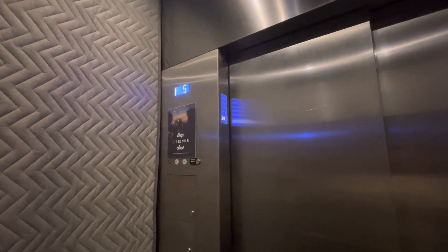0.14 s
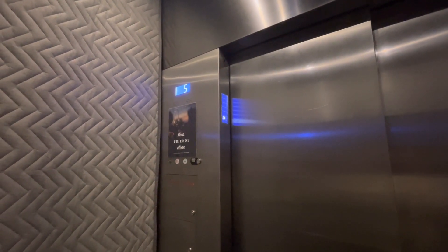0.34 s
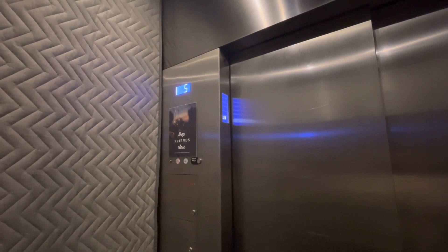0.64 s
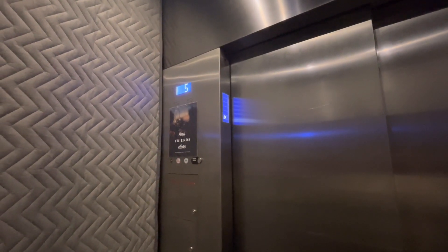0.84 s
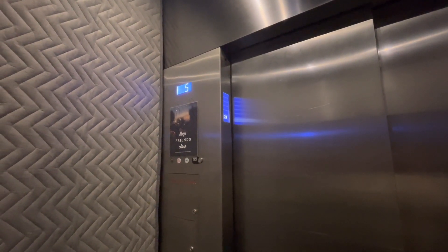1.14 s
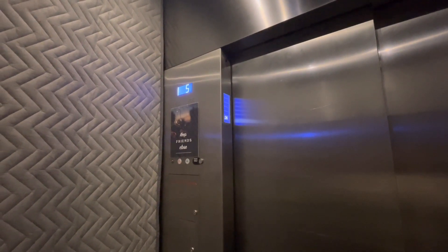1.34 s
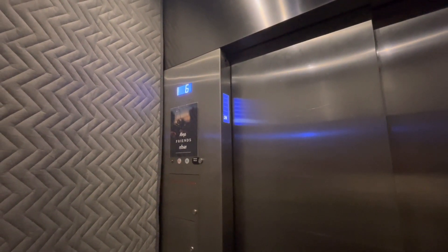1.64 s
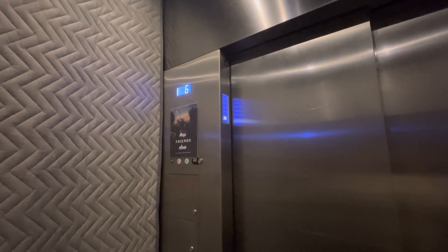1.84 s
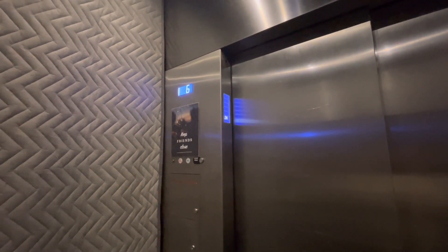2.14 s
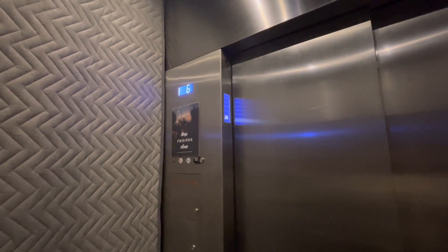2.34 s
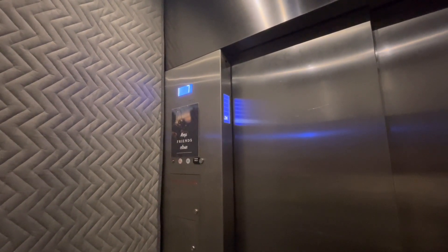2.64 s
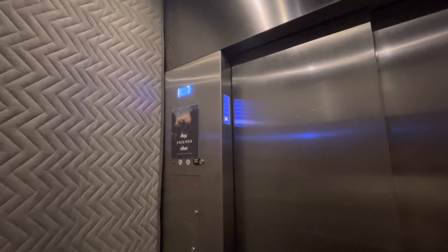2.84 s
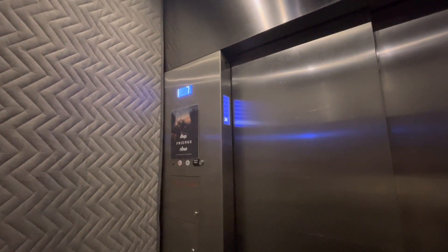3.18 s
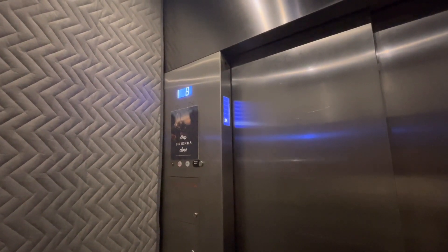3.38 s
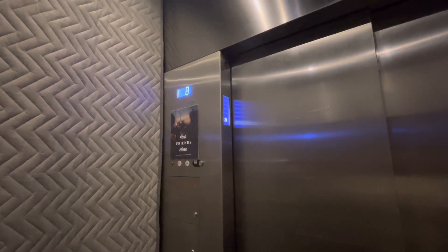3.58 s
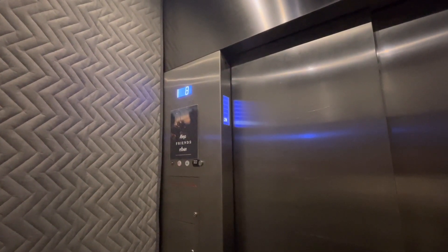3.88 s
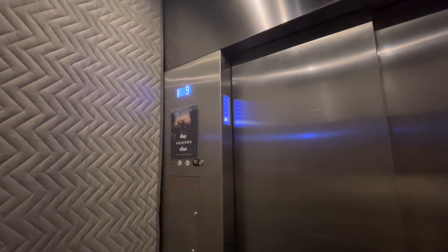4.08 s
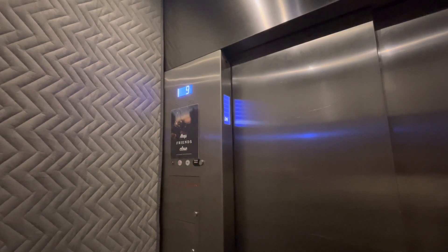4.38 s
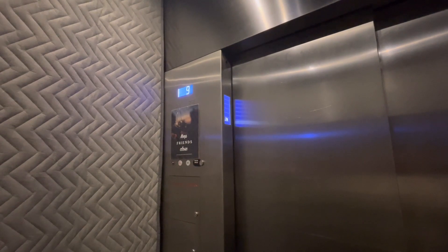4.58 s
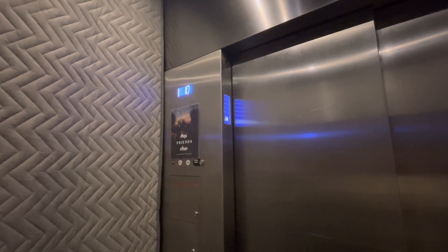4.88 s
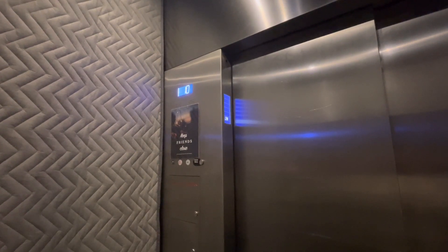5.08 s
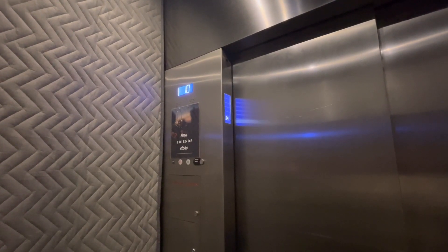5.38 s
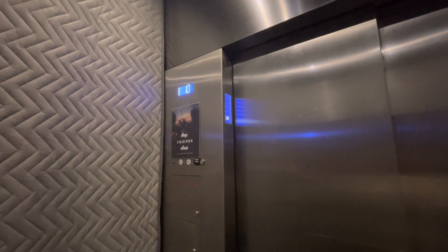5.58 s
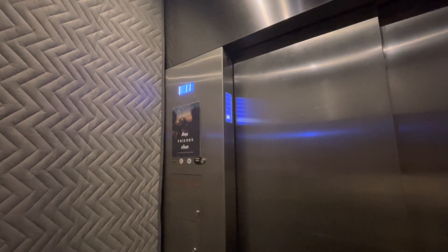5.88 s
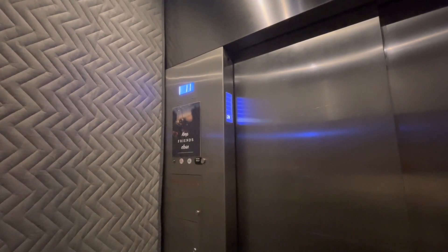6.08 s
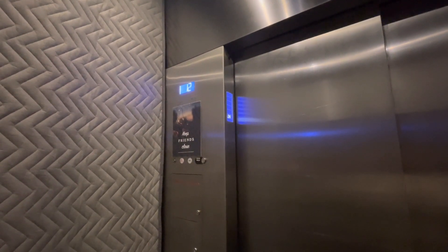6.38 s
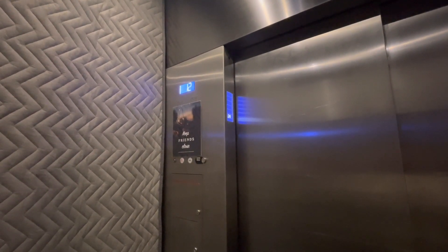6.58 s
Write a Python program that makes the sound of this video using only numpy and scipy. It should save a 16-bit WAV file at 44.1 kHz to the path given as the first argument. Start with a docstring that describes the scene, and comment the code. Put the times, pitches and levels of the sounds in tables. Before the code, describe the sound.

Inside a small steel elevator car, a low rumble and a ventilation fan run throughout. The motor hum rises in pitch as the car gathers speed, then holds, while air rushes along the shaft. A latch gives a dull clack early on. Each passing floor brings a soft, low puff of air, and the door panels tick and rattle faintly, with soft scuffs and one tiny squeak near the end.

```python
"""A low rumble and a rising hum fill a steel elevator car as it gathers speed, then cruises upward.
The rollers shake the cabin's air modes, the drive's hum blooms as it climbs through them, and air
rushes along the shaft. Each landing passes with a soft buffet of squeezed air. Small impacts ring
a latch, the door panels and the trim; soft scuffs and rustles come and go, a guide shoe squeaks
once, and a ventilation fan runs throughout."""
import sys
import numpy as np
from scipy import signal
from scipy.fft import rfft, irfft
from scipy.io import wavfile

SR = 44100
rng = np.random.default_rng(int(sys.argv[2]) if len(sys.argv) > 2 else 0)


def transcribe(signal):
    """Save signal, clipped to [-1, 1], as a 16-bit WAV file at the path in sys.argv[1]."""
    frames = np.atleast_2d(signal).T
    limited = np.clip(frames, -1, 1)
    pcm = np.round(limited * 32767).astype(np.int16)
    wavfile.write(sys.argv[1], SR, pcm)


N = 296352
T = np.arange(N) / SR
HZ = np.maximum(np.fft.rfftfreq(N, 1 / SR), 1)

# The drive's hum. Each row: time in seconds, pitch in Hz, level in dB, depth of waver from 0 to 1.
DRIVE_CURVE = [(0, 66, -53.5, 0.35), (.42, 75, -52.5, 0.4), (.9, 82, -49.5, 0.4), (1.1, 95, -50, 0.65),
               (1.28, 97.5, -41.5, 0), (1.45, 100, -46, 0.6), (1.9, 116, -56, 0.6), (2.36, 126, -54, 0.4),
               (2.48, 127.5, -35, 0.25), (2.64, 127, -47, 0.2), (2.78, 128, -39.5, 0.2),
               (2.95, 139, -47.5, 0.65), (3.11, 146, -37.5, 0.38), (3.25, 153.3, -48.5, 0.26),
               (3.6, 153, -46.5, 0.22), (4.0, 152.9, -46, 0.25), (4.25, 152.5, -42.5, 0.28),
               (4.68, 152.3, -39, 0.2), (4.85, 152, -47.5, 0), (4.98, 152, -43, 0.03),
               (5.3, 152.1, -47, 0.4), (6.72, 152, -51, 0.35)]
# Noise spectra. Each row: frequency in Hz, relative spectral density in dB.
RUMBLE_SPECTRUM = [(15, -22.5), (30, -13), (52, -5), (75, -1), (102, -5), (130, -13.5), (200, -17.5),
                   (300, -27.5), (600, -42.5), (2000, -85)]
BOOM_SPECTRUM = [(60, -24.5), (105, -12.5), (126, -2), (143, -6), (160, -11.5), (185, -16), (400, -39),
                 (1000, -86.5)]
RUSH_SPECTRUM = [(60, -10.5), (130, -3), (200, 3), (300, 4), (420, -2.5), (560, -5.5), (750, -13.5),
                 (950, -21), (1300, -22.5), (1600, -30), (2100, -37), (3000, -45.5), (6000, -62)]
BUFFET_SPECTRUM = [(12, -9.5), (30, -4.5), (48, 4.5), (64, 3), (80, 0), (110, -12), (250, -42.5),
                   (1000, -85)]
FAN_SPECTRUM = [(30, -16.5), (130, -2.5), (230, 2.5), (400, -20.5), (700, -26.5), (1000, -32),
                (1300, -23.5), (1750, -36), (2600, -51.5), (5000, -60.5), (7000, -50.5), (9000, -56),
                (12500, -72)]
HISS_SPECTRUM = [(800, -7.5), (2000, 2), (2800, 0), (4500, 4.5), (6500, 0), (8500, -5), (11000, -5),
                 (13000, -15.5)]
# Resonances that colour the noise. Each row: frequency in Hz, bandwidth in Hz, lift or dip in dB.
CABIN_MODES = [(77.4, 6.4, 6.5), (96, 5.7, 7), (128.4, 15, 5.5), (153, 16, 7.5), (184, 43, -4),
               (212.2, 13, 7.5), (240.1, 7, 11), (264.7, 26, -5.5), (278.7, 4.1, 12), (281, 7.7, -4),
               (310.3, 20, 3.5), (332.4, 8, -6.5), (342, 60, 3), (766, 150, 3.5), (1460, 150, 4.5)]
DUCT_MODES = [(133, 56, 9.5), (158.4, 8, 6.5), (1400, 31, 6), (6350, 500, 6.5), (12000, 250, 6)]
HISS_MODES = [(2280, 65, 6), (2630, 60, 4), (3600, 130, 4), (4730, 430, 1), (6230, 150, 6.5),
              (6700, 200, 5)]
# Modes of solid parts. Each row: frequency in Hz, bandwidth in Hz, gain in dB.
LATCH_MODES = [(523, 230, 3), (895, 490, 4.5), (1340, 110, 12), (1630, 83, -9), (2230, 140, 1),
               (2780, 110, -3)]
TRIM_MODES = [(4800, 1200, 0), (6340, 330, 7.5), (6950, 360, 4), (9500, 3400, -5.5)]
PANEL_MODES = [(1450, 230, 6.5), (1850, 280, 8.5), (2200, 70, 10), (2360, 180, 7.5), (2820, 180, 7),
               (3100, 440, 3.5), (4070, 3000, 0)]
SHOE_MODES = [(2600, 120, -1), (2900, 400, -8), (3640, 200, -12), (6430, 160, -14)]
# Passing swells. Each row: time of the crest in seconds, level in dB, half-width in seconds.
CAR_SWAYS = [(1.62, -48.5, 0.086), (4.224, -42, 0.12)]
LANDING_BUFFETS = [(1.597, -39.5, 0.065), (2.417, -40, 0.049), (3.208, -41.5, 0.098), (4.04, -41.5, 0.051),
                   (4.713, -44, 0.035), (5.585, -40.5, 0.038), (6.35, -43.5, 0.063)]
ROLLER_SPELLS = [(4.027, -68.5, 0.11), (4.68, -67.5, 0.27), (5.246, -71, 0.25), (6.252, -69.5, 0.12)]
HISS_SWELLS = [(3.67, -81, 0.13), (3.7, -81.5, 0.53), (4.857, -91.5, 0.37), (5.913, -84.5, 0.095)]
# Low notes of the cabin. Each row: crest in seconds, level in dB, half-width in seconds, pitch in Hz.
CABIN_DRONES = [(2.09, -41, 0.091, 96), (4.12, -45, 0.067, 74), (4.31, -44.5, 0.09, 77.5),
                (6.417, -44.5, 0.1, 143), (6.683, -44, 0.12, 132.9)]
# A latch clacks and settles. Each row: start in seconds, peak in dB, upper edge of the blow in Hz.
LATCH_CLACKS = [(0.9985, -42, 1400), (1.0266, -49, 2600)]
# Ticks of the trim. Each row: start in seconds, peak in dB, low and high edges in Hz, after-ring in dB.
TRIM_TICKS = [(.643, -71, 3300, 5800, -20), (.708, -72, 2000, 2590, -16), (.869, -65, 3300, 7800, -17),
              (1.026, -65.5, 5600, 8050, -22), (1.317, -70, 3520, 11000, -27), (3.874, -62, 4800, 10000, 2),
              (4.399, -65.5, 5200, 10600, -0.5), (4.9265, -55.5, 4750, 6950, -8.5),
              (6.292, -80, 7500, 9500, -16), (6.337, -67.5, 4500, 9900, -8), (6.343, -63, 5800, 9350, -13)]
# Door panels knock in their tracks.
# Each row: start in seconds, relative level in dB, rise in seconds, lift of the clear note in dB.
DOOR_KNOCKS = [(0.122, -82.5, 0.00041, -6), (0.7913, -80, .0005, -1), (1.61, -85.5, .0005, 0),
               (1.734, -92, .0005, 6), (1.8791, -93.5, 0.00068, 7), (2.01, -82, 0.0025, 1.5),
               (2.144, -87, .002, 5), (2.441, -89, .001, -0.5), (2.725, -82, 0.00086, 5),
               (2.8557, -82.5, .002, -2), (3.877, -83, .001, -13), (4.398, -81, .001, -9.5),
               (5.049, -86, .005, -2), (5.173, -77.5, .002, 2), (5.88, -81.5, 0.0027, 1),
               (6.002, -89, .003, 2), (6.283, -83, .007, 3), (6.402, -80.5, 0.0079, 1),
               (6.5023, -85.5, 0.0033, 2)]
# Soft scuffs, a brief swell of low rush and a short mid-pitched ring.
# Each row: crest in seconds, level in dB, fade in seconds, centre in Hz, bandwidth in Hz.
SOFT_SCUFFS = [(1.385, -70, 0.23, 450, 220), (1.433, -82, 0.039, 6360, 2500),
               (2.392, -88, 0.036, 9800, 2500), (2.51, -82.5, 0.057, 4600, 8000),
               (3.069, -76.5, 0.13, 1850, 1400), (3.231, -81.5, 0.078, 2700, 1225),
               (3.325, -63, 0.22, 744, 130), (4.062, -77, 0.069, 2870, 2200),
               (4.02, -77, 0.037, 6400, 2510), (5.327, -71.5, 0.09, 1460, 700),
               (5.577, -81, 0.1, 4800, 3000), (5.62, -85, .03, 10100, 3000),
               (5.84, -90, 0.053, 10100, 2500)]
# The inverter's whine. Each row: frequency in Hz, level in dB.
INVERTER_TONES = [(11880, -113), (12000, -110), (12152, -117)]
# Stereo spread of the air noise. Each row: frequency in Hz, side minus mid in dB.
STEREO_WIDTH = [(30, -22.5), (80, -16), (160, -8), (330, -8), (650, -2), (1400, -2.5), (3000, 1.5),
                (12000, -1)]
# Stereo balance of the air noise. Each row: frequency in Hz, left minus right in dB.
STEREO_LEAN = [(60, 0.5), (110, -4.5), (200, 1.5), (360, 0.5), (640, 1.5), (1160, 2.5), (2110, -2.5),
               (3810, -0.5), (6890, 4), (12500, -4.5)]


def drive_hum(wander_hz=0.4):
    """Forced vibration: the drive's tone climbs, blooming and steadying on air modes of the cabin."""
    pitch, level_db, waver = in_time(DRIVE_CURVE)
    phase = 2 * np.pi * np.cumsum(pitch + wander_hz * drift(5.5)) / SR
    tone = np.sin(phase) * (1 + waver * drift(19)) + np.cos(phase) * waver * drift(22)
    return tone / np.sqrt(.5 + waver ** 2) * from_db(level_db) * pan(left_db=-0.3)


def roller_rumble(flow, db=-45.5):
    """Broadband excitation: the rollers shake the cabin's air modes, harder when the car sways."""
    shaking = with_swells(from_db(db) * flow ** 0.35, CAR_SWAYS)
    return shaking * air_noise(RUMBLE_SPECTRUM, CABIN_MODES)


def cabin_boom(flow, db=-44.5):
    """Cavity resonance colours a low band of noise that grows with speed."""
    return from_db(db) * flow ** 1.6 * air_noise(BOOM_SPECTRUM, CABIN_MODES)


def shaft_rush(flow, db=-48.5, gust_db=1.0):
    """Turbulence: the noise of uneven air flow along the shaft grows as a steep power of speed."""
    return from_db(db + gust_db * drift(10)) * flow ** 2.6 * air_noise(RUSH_SPECTRUM, CABIN_MODES)


def landings(gain_db=0.5):
    """Compression of the air between car and landing door gives one low swell per floor."""
    air, out = air_noise(BUFFET_SPECTRUM), 0
    for s, db, length in LANDING_BUFFETS:
        push = swell(s, length)
        out += from_db(db + gain_db) * rms_one(push * air) * np.sqrt(np.mean(push ** 2))
    return out


def drones(waver=0.62):
    """Resonance: the cabin's air briefly swells and fades on single low notes."""
    notes = sum(from_db(db) * swell(s, length) * np.sin(2 * np.pi * (hz * T + rng.random()))
                for s, db, length, hz in CABIN_DRONES)
    return np.sqrt(2) * notes * (1 + waver * drift(22))


def latch(echo_db=-29, cabin_t60=0.15, top_hz=3200):
    """Impulse response: a dull blow and its faint reflections ring the modes of the latch plate."""
    out, t = np.zeros((2, N)), T[:SR // 3]
    for s, db, edge_hz in LATCH_CLACKS:
        echoes = from_db(echo_db - 60 * t / cabin_t60) * rng.standard_normal((2, len(t)))
        blow = lowpass((t == 0) + echoes, edge_hz, order=2)
        plate = sum(from_db(gain) * resonate(blow, hz, width) for hz, width, gain in LATCH_MODES)
        add(out, s, from_db(db) * plate / np.abs(plate).max())
    return lowpass(out + 1e-18, top_hz, order=4)


def trim_ticks(crack_t60=0.011, cabin_t60=0.24):
    """Reverberation: after a brief crack, the ring of the trim lingers in the small cabin."""
    out, t = np.zeros((2, N)), T[:SR // 3]
    for s, db, low, high, ring_db in TRIM_TICKS:
        crack = from_db(-60 * t / crack_t60) * rng.standard_normal(len(t))
        echoes = from_db(ring_db - 60 * t / cabin_t60) * rng.standard_normal((2, len(t)))
        band = signal.butter(2, [low, high], "band", fs=SR, output="sos")
        tick = signal.sosfilt(band, crack + ring(echoes, TRIM_MODES))
        add(out, s, from_db(db) * tick / np.abs(tick).max())
    return out


def door_knocks(gain_db=16.5, strike_db=7, rattle_t60=0.21, note_hz=2187, note_db=-4, note_t60=0.12):
    """Modal ringing: a struck panel rattles; the point of impact sets how clearly one mode sings."""
    blows, notes, t = np.zeros((2, N)), np.zeros((2, N)), T[:SR // 3]
    strike = from_db(strike_db) * (t == 0)
    for s, db, rise_s, clear_db in DOOR_KNOCKS:
        rise = 1 - np.exp(-t / rise_s)
        rattle = rise * from_db(-60 * t / rattle_t60) * rng.standard_normal((2, len(t)))
        add(blows, s, from_db(db) * (strike + rattle))
        note = np.sin(2 * np.pi * (note_hz * t + rng.random((2, 1))))
        add(notes, s, from_db(db + note_db + clear_db - 60 * t / note_t60) * rise * note)
    panel = lowpass(ring(blows, PANEL_MODES), hz=8200, order=3)
    return from_db(gain_db) * (panel + notes) * pan(left_db=-0.7)


def scuffs(grain_db=2.5, rise_share=0.9):
    """Band-limited noise swells and fades, heard as grainy scuffs, a low rush or a short ring."""
    out, t = np.zeros((2, N)), T[:SR * 3 // 4]
    middle = t.mean()
    for s, db, fade_s, hz, width in SOFT_SCUFFS:
        half_width = np.where(t < middle, rise_share * fade_s, fade_s)
        envelope = np.exp(-((t - middle) / half_width) ** 2)
        add(out, s - middle, from_db(db) * envelope * noise_band(hz, width, len(t)))
    return out * from_db(grain_db * drift(70))


def squeak(start_s=5.53, db=-73, rise_s=0.0076, fade_s=0.125, slips_per_s=2500):
    """Stick-slip friction: a dense run of slips rings a guide shoe on one thin note."""
    out, t = np.zeros((2, N)), T[:SR // 3]
    slips = (rng.random(len(t)) < slips_per_s / SR) * rng.standard_normal((2, len(t)))
    envelope = (1 - np.exp(-t / rise_s)) * np.exp(-(t / fade_s) ** 2)
    add(out, start_s, from_db(db) * envelope * rms_one(ring(slips, SHOE_MODES)))
    return out


def roller_song(steady_db=-82, flutter_db=3):
    """Rolling contact sustains one steel resonance, which sings out in spells."""
    level = with_swells(from_db(steady_db), ROLLER_SPELLS)
    return noise_band(hz=1390, width=60) * level * from_db(flutter_db * drift(16))


def metal_whine(speed, db=-75, flutter_db=0.5):
    """A lightly damped resonance gives a thin metallic whine, its amplitude proportional to speed."""
    return from_db(db + flutter_db * drift(8.3)) * speed * noise_band(hz=1360, width=22)


def fan(db=-53.5):
    """Duct resonances colour the steady flow noise of the ventilation fan."""
    return from_db(db) * air_noise(FAN_SPECTRUM, DUCT_MODES)


def faint_hiss(flow, db=-87.5, flutter_db=0.8):
    """Amplitude modulation: a faint, broad hiss rises with speed and swells in soft rustles."""
    level = with_swells(from_db(db) * flow ** 0.67, HISS_SWELLS)
    return level * from_db(flutter_db * drift(4.3)) * air_noise(HISS_SPECTRUM, HISS_MODES)


def inverter(wander_hz=2):
    """Switching in the drive's inverter gives a faint high tone with two sidebands."""
    return sum(from_db(db) * rms_one(np.sin(2 * np.pi * np.cumsum(hz + wander_hz * drift(13)) / SR))
               for hz, db in INVERTER_TONES)


def from_db(db):
    """Decibels to amplitude ratio."""
    return 10 ** (np.asarray(db) / 20)


def rms_one(x):
    """Normalisation to unit rms."""
    return x / np.sqrt(np.mean(x ** 2) + 1e-20)


def pan(left_db):
    """Level panning: the right channel loses the decibels that the left gains."""
    return from_db([[left_db], [-left_db]])


def in_time(rows):
    """Linear interpolation of each column at every sample."""
    s, *columns = np.transpose(rows)
    return [np.interp(T, s, c) for c in columns]


def over_hz(points):
    """Linear interpolation over log frequency."""
    hz, value = np.transpose(points)
    return np.interp(np.log(HZ), np.log(hz), value)


def drift(rate_hz):
    """Slow random fluctuation of unit rms."""
    return rms_one(irfft(rfft(rng.standard_normal(N)) / (1 + (HZ / rate_hz) ** 2), N))


def swell(s, length):
    """A Gaussian envelope of height 1 at time s, down to 1/e at length seconds to either side."""
    return np.exp(-((T - s) / length) ** 2)


def with_swells(steady, rows):
    """Incoherent addition: a steady gain and its swells sum in power."""
    return np.sqrt(steady ** 2 + sum((from_db(db) * swell(s, length)) ** 2 for s, db, length in rows))


def air_noise(spectrum, modes=()):
    """Coloured stereo noise with resonances; long waves reach left and right nearly alike."""
    lift_db = sum(db / (1 + (2 * (HZ - hz) / width) ** 2) for hz, width, db in modes)
    mid, side = np.exp(2j * np.pi * rng.random((2, len(HZ)))) * from_db(over_hz(spectrum) + lift_db)
    signs = np.array([[1], [-1]])
    pair = mid + signs * side * from_db(over_hz(STEREO_WIDTH))
    balance = from_db(signs * over_hz(STEREO_LEAN) / 2)
    return irfft(pair * balance, N) / np.std(irfft(mid, N))


def resonate(x, hz, width):
    """A damped two-pole resonator with unit gain at its peak."""
    r = np.exp(-np.pi * width / SR)
    feedback = [1, -2 * r * np.cos(2 * np.pi * hz / SR), r * r]
    return signal.lfilter(np.array([1, 0, -1]) * (1 - r * r) / 2, feedback, x + 1e-18)


def ring(x, modes):
    """Modal superposition: a body's modes respond side by side, alternating in sign."""
    return sum((-1) ** k * from_db(db) * resonate(x, hz, width)
               for k, (hz, width, db) in enumerate(modes))


def noise_band(hz, width, samples=N):
    """Stereo noise passed twice through one resonance, at unit rms."""
    return rms_one(resonate(resonate(rng.standard_normal((2, samples)), hz, width), hz, width))


def lowpass(x, hz, order):
    """Attenuation of the treble above hz."""
    return signal.sosfilt(signal.butter(order, hz, fs=SR, output="sos"), x)


def add(out, s, sound):
    """Superposition of a short sound at time s."""
    at = max(round(s * SR), 0)
    out[:, at:at + sound.shape[1]] += sound[:, :N - at]


def scene(start_speed=0.4, cruise_from_s=4.2, levels_off=0.78):
    """All sources superpose in a car that accelerates uniformly to its cruising speed, taken as 1."""
    speed = np.minimum(start_speed + (1 - start_speed) * T / cruise_from_s, 1)
    flow = np.minimum(speed / levels_off, 1)  # the ride noise levels off before the speed does
    noise = roller_rumble(flow) + cabin_boom(flow) + shaft_rush(flow) + faint_hiss(flow) + fan()
    tones = drive_hum() + drones() + roller_song() + metal_whine(speed) + inverter()
    brief_sounds = door_knocks() + trim_ticks() + latch() + scuffs() + squeak()
    return noise + tones + brief_sounds + landings()


def record(dry, fade_s=0.002, cutoff_hz=12900):
    """Band limiting: a steep low-pass filter cuts the top, after brief fades at both ends."""
    ends = np.clip(np.minimum(T, T[-1] - T) / fade_s, 0, 1)
    return signal.sosfilt(signal.ellip(10, .1, 70, cutoff_hz, fs=SR, output="sos"), dry * ends)


dry = scene()
out = record(dry)
transcribe(out)
```